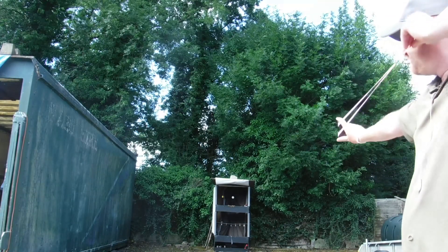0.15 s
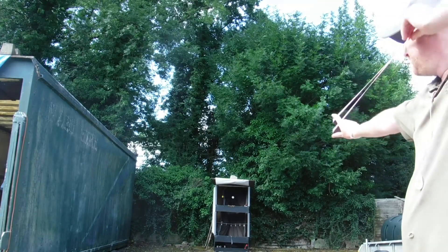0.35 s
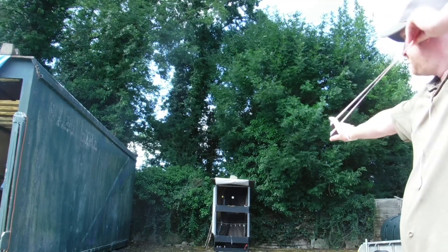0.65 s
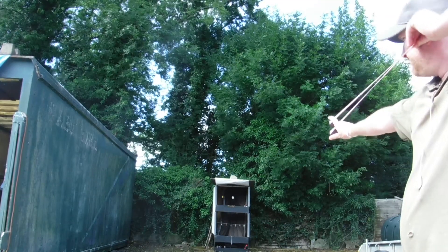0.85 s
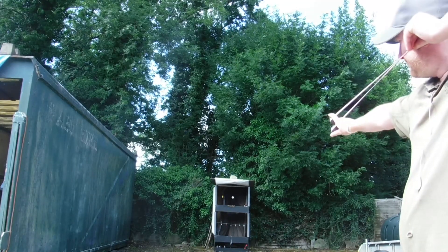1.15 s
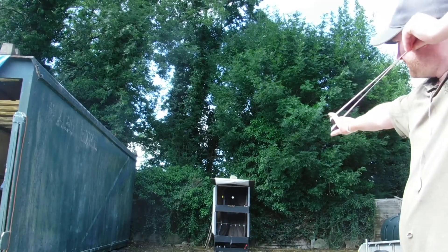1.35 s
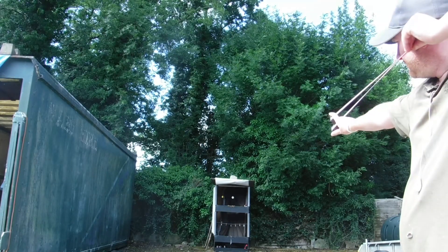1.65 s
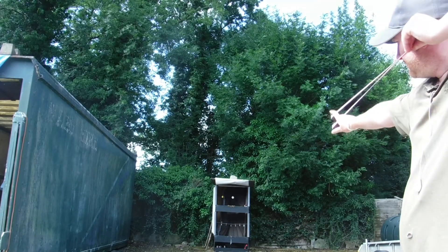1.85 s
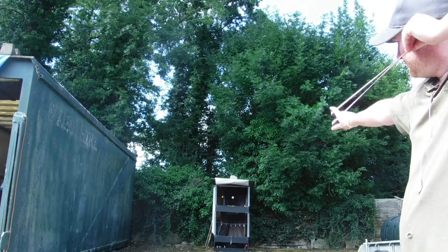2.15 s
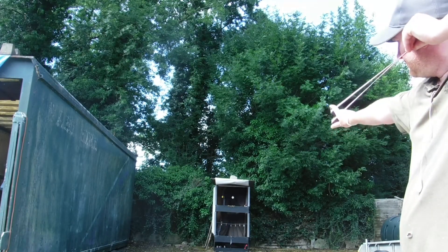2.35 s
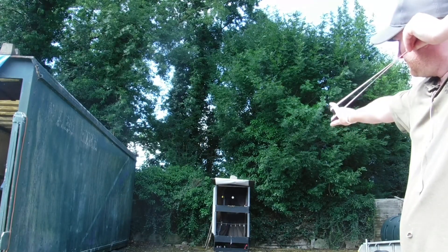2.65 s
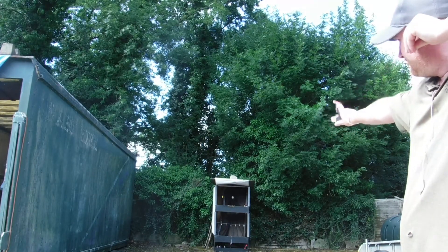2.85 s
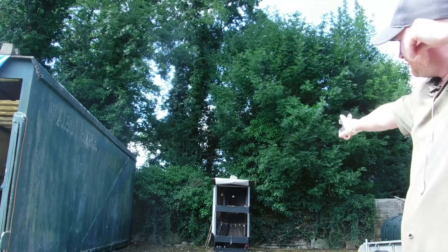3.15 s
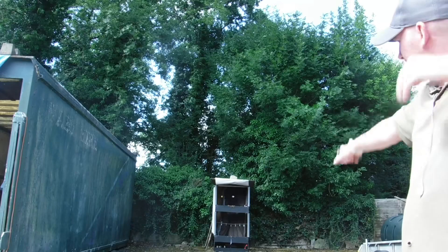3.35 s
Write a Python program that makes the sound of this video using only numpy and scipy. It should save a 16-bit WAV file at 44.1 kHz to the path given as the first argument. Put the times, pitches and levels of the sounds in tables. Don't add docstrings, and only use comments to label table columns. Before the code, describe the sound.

A slingshot snaps sharply, its ball cracks against a catch box, then drops with a softer knock.

```python
import sys
import numpy as np
from scipy import signal
from scipy.fft import rfft, irfft
from scipy.io import wavfile
from scipy.ndimage import uniform_filter1d

SR = 44100
rng = np.random.default_rng(int(sys.argv[2]) if len(sys.argv) > 2 else 0)


def volts(x):
    e = np.asarray(x, float) / 20
    return 10 ** e


def transcribe(signal):
    frames = np.atleast_2d(signal).T
    limited = np.clip(frames, -1, 1)
    pcm = np.round(limited * 32767).astype(np.int16)
    wavfile.write(sys.argv[1], SR, pcm)


N = 154350
HEDGE_GRAIN_DB = 1.2


def band(x, hz, width_hz):
    return signal.lfilter(*signal.iirpeak(min(hz, .45 * SR), max(hz / width_hz, .3), fs=SR), x)


def steep(x, hz, width_hz):
    return band(band(x, hz, width_hz), hz, 2 * width_hz)


def dull(x, hz):
    return signal.lfilter(*signal.butter(2, min(hz, .45 * SR), fs=SR), x)


def unit(x):
    return x / np.sqrt(np.mean(x ** 2))


def peak(x, db):
    return x * volts(db) / np.abs(x).max()


def colour(points, size):
    hz, db = np.array(points, float).T
    f = np.arange(size // 2 + 1) * SR / size + 1
    gain = volts(np.interp(np.log(f), np.log(hz), db))
    return unit(irfft(rfft(rng.standard_normal(size)) * gain, size))


def tint(x, points):
    hz, db = np.array(points, float).T
    f = np.arange(1025) * SR / 2048 + 1
    cepstrum = irfft(np.log(volts(np.interp(np.log(f), np.log(hz), db))))
    folded = np.r_[cepstrum[0], 2 * cepstrum[1:1024], np.zeros(1024)]
    h = irfft(np.exp(rfft(folded)))[:1024]
    return signal.fftconvolve(x, h / np.linalg.norm(h))[:len(x)]


def walk(rate_hz, size=N):
    k = max(int(SR / rate_hz), 1)
    steps = rng.standard_normal(size + 1)[:size // k + 1]
    return unit(uniform_filter1d(np.repeat(steps, k), k)[:size])


def fall(t, t60_s):
    return (t >= 0) * volts(-60 * np.maximum(t, 0) / t60_s)


def swell(rows):
    t = np.arange(N) / SR
    out = np.zeros(N)
    for s, rise, hold, t60_s, db in rows:
        release = fall(np.maximum(t - s - rise - hold, 0), t60_s)
        out += volts(db) * np.clip((t - s) / rise, 0, 1) * release
    return out


def grains(points, envelope, rate_hz, spread_db):
    size = len(envelope)
    level = volts(spread_db * walk(rate_hz, size=size)) * envelope
    return tint(rng.standard_normal(size) * level, points)


def add(out, s, x):
    i = int(round(s * SR))
    out[i:i + len(x)] += x[:N - i]


def add_peak(out, s, x):
    add(out, s - np.abs(x).argmax() / SR, x)


def air():
    # (frequency [Hz], density [dB per Hz])
    hiss_tone = [(18, -39), (30, -12.5), (415, -9.5), (1040, -5.5), (1430, -2.5), (1860, -9), (4910, -7),
                 (8300, -21.5), (16000, -29.5)]
    # (frequency [Hz], width [Hz], level [dB])
    drones = [(1420, 170, -59), (6860, 250, -75), (9490, 450, -74), (11600, 700, -79), (14500, 3000, -74),
              (15350, 500, -81), (4700, 1500, -56)]
    # (frequency [Hz], level [dB])
    whine = [(6844, -72), (6784, -81), (6904, -80), (7420, -85)]
    # (start [s], rise [s], hold [s], fall t60 [s], level [dB])
    gusts = [
        (.6, 0.052, .05, 0.285, -55),
        (.76, 0.032, 0.216, 0.31, -55),
    ]
    # (start [s], rise [s], hold [s], fall t60 [s], level [dB])
    rustles = [
        (.62, 0.0085, 0.076, .1, -67),
        (1.61, 0.012, 0.064, .1, -68),
        (2.66, 0.017, 0.092, .1, -68),
    ]
    rustle_hz, waver_db, gust_db = 11200, 1.2, 4
    t = np.arange(N) / SR
    out = volts(-50.5) * fall(t, 194) * colour(hiss_tone, size=N)
    for hz, width_hz, db in drones:
        waver = walk(4.516) / 2 + walk(24.904)
        out += volts(db + waver_db * waver) * unit(steep(rng.standard_normal(N), hz, width_hz))
    for hz, db in whine:
        out += volts(db) * np.sin(2 * np.pi * hz * t)
    out += swell(gusts) * unit(steep(rng.standard_normal(N), 3230, 1800))
    for k in (.865, 1.055):
        out += swell(rustles) * unit(steep(rng.standard_normal(N), k * rustle_hz, 1300))
    breeze = unit(band(rng.standard_normal(N), 105, 63))
    return out + volts(-69 + gust_db * walk(2.95)) * fall(t, 8.2) * breeze


def sparrow():
    # (start [s], length [s], level [dB], top [Hz], lowest [Hz])
    chirps = [(.002, 0.0366, -46.5, 6150, 4528), (0.197, 0.0362, -42, 6080, 4684),
              (0.339, 0.157, -58.5, 2291, 1903), (0.591, 0.04, -44, 6049, 4805),
              (0.621, 0.0846, -49.5, 4876, 4129), (0.766, 0.042, -42.5, 6084, 4210),
              (0.801, 0.087, -48.5, 4900, 4113), (0.934, 0.0458, -43, 5953, 4605),
              (0.952, 0.0754, -49.5, 4793, 4020), (1.101, 0.0537, -44.5, 6235, 4788),
              (1.382, 0.0424, -46.5, 6130, 4574), (1.662, 0.059, -45, 6200, 4611),
              (1.844, 0.0539, -44, 5990, 4421), (2.027, 0.0558, -44, 6093, 4441),
              (2.237, 0.0476, -44, 6200, 4576), (2.469, 0.048, -45.5, 5800, 4277),
              (2.757, 0.0707, -43, 5960, 4497), (3.247, 0.0336, -45, 6050, 4530),
              (3.456, 0.0304, -44.5, 6057, 4500)]
    warble_hz, warble_jitter, first_dip, direct_gain = 147.45, .35, .8, 0.65
    out = np.zeros(N)
    for s, length_s, db, top_hz, low_hz in chirps:
        u = np.arange(int(length_s * SR)) / (length_s * SR)
        rate_hz = warble_hz * (1 + warble_jitter * walk(120, size=len(u)))
        swing = np.abs(signal.sawtooth(np.pi * np.cumsum(rate_hz) / SR + np.pi))
        depth = first_dip + (1 - first_dip) * np.sqrt(u)
        hz = top_hz + 120 - (240 + top_hz - low_hz) * depth * swing
        fade = np.clip(12 * np.minimum(u, 1 - u), 0, 1)
        add(out, s, volts(db) * np.sin(2 * np.pi * np.cumsum(hz) / SR) * fade)
    trees = rng.standard_normal(SR // 2) * fall(np.arange(SR // 2) / SR, 0.333)
    blurred = signal.fftconvolve(out, trees / np.linalg.norm(trees))[:N]
    return 1.075 * blurred + direct_gain * out


def ticks():
    # (peak [s], level [dB], ring [Hz], width [Hz])
    clicks = [(.6845, -39, 2300, 1100), (1.0387, -25, 3900, 2200), (1.0408, -35, 4300, 1800),
              (1.034, -49, 230, 150), (2.7590, -35, 5000, 900), (2.800, -43, 70, 200),
              (2.822, -32, 250, 300), (2.8225, -22, 800, 500), (2.9690, -33, 260, 200),
              (2.970, -24, 850, 500), (2.992, -48, 220, 250), (3.08, -60, 50, 60), (3.125, -55, 180, 80),
              (3.132, -54, 55, 60), (3.172, -55, 90, 60)]
    out, t = np.zeros(N), np.arange(1500) / SR
    for s, db, hz, width_hz in clicks:
        push = (1 + .3 * rng.standard_normal(1500)) * fall(t, 0.0003)
        add_peak(out, s, peak(steep(push, hz, width_hz), db))
    return out


def bands():
    # (peak [s], level [dB], ring [Hz], push length [s], low slap [dB])
    snaps = [(2.7990, -17.5, 4800, 0.00053, -7.5), (2.8001, 6.5, 4755, 0.000298, -20.5),
             (2.8052, -12, 4700, 0.00063, -7), (2.8064, -16, 5300, 0.00034, -5.5),
             (2.8093, -21, 5000, 0.00048, -6), (2.813, -12, 4500, 0.001, -2.5),
             (2.8144, -1.5, 5050, 0.00094, 1), (2.8161, 0, 5200, 0.000272, -6),
             (2.8175, -13, 6000, 0.0005, 1), (2.8188, -10, 5500, 0.00061, 2.5),
             (2.8197, -6, 4550, 0.00049, 6.5), (2.8212, -10.5, 5060, 0.00055, 7),
             (2.8223, 8, 4683, 0.00056, -2.5), (2.8234, 4, 5620, 0.000431, 0),
             (2.8241, -17.5, 4000, .0005, 0), (2.8266, 3, 4555, 0.000578, -4),
             (2.832, -14, 5350, 0.00024, -3), (2.8325, -22.5, 5140, 0.00071, -4.5),
             (2.8339, -15, 4610, .0004, 3.5), (2.8354, -9, 4760, 0.00037, -3.5),
             (2.8367, -10.5, 4220, 0.0004, 4), (2.8391, -7, 5630, .0007, -12.5),
             (2.8405, -7, 4850, .0004, -10), (2.8428, -10.5, 4760, 0.0005, 2),
             (2.8455, -8.5, 4980, 0.00042, -13), (2.8494, -19.5, 5490, 0.00075, -5),
             (2.8732, -29.5, 5170, .0008, 5), (2.8838, -22.5, 4330, 0.00091, 7),
             (2.8897, -20, 4800, .0008, -6), (2.906, -27.5, 5750, .0008, -10.5)]
    # (start [s], rise [s], hold [s], fall t60 [s], level [dB])
    flutter = [
        (2.797, 0.00303, .001, 0.0116, -25),
        (2.803, 0.0184, 0.0063, 0.0353, -19),
        (2.829, 0.00394, 0.0119, 0.0253, -21),
    ]
    # (frequency [Hz], density [dB per Hz])
    flutter_tone = [(59, -86), (100, -32.5), (910, -18), (1310, -18), (1650, -11), (3320, -7), (5420, -2.5),
                    (9820, -19), (16000, -33.5)]
    # (start [s], rise [s], hold [s], fall t60 [s], level [dB])
    wash = [
        (2.848, 0.0038, 0.0116, 0.137, -35),
        (2.870, 0.0115, 0.0108, 0.51, -34.5),
    ]
    # (frequency [Hz], density [dB per Hz])
    wash_tone = [(100, -48.5), (300, -27.5), (1100, -20.5), (1650, -9.5), (3600, -7.5), (4800, 0.5),
                 (7000, -8.5), (10500, -21.5), (16000, -44)]
    out, t = np.zeros(N), np.arange(600) / SR
    for s, db, hz, push_s, low_db in snaps:
        push = np.clip(np.minimum(t / .0002, 2 - 2 * t / push_s), 0, 1)
        hit = rng.standard_normal(600) * push
        bright = volts(-16 + 1.4 * db) * unit(steep(hit, 14000, 4880))
        ring = unit(unit(steep(hit, hz, 1068)) + bright)
        slap = volts(-11 + low_db) * unit(steep(hit, 1770, 1068))
        wide = volts(-3) * unit(tint(hit, flutter_tone))
        add_peak(out, s, peak(ring + slap + wide, db))
    out += grains(flutter_tone, swell(flutter), rate_hz=980, spread_db=3)
    return out + grains(wash_tone, swell(wash), rate_hz=400, spread_db=HEDGE_GRAIN_DB)


def tail(near_db, far_db, last_s):
    # (frequency [Hz], density [dB per Hz])
    near_tone = [(300, -59.5), (519, -25.5), (1170, -8.5), (1430, -12.5), (4090, 3), (7500, -14.5),
                 (10400, -26), (16000, -50.5)]
    # (frequency [Hz], density [dB per Hz])
    far_tone = [(300, -35.5), (470, -30), (1140, -21.5), (1400, -15.5), (3300, -3.5), (5000, -9),
                (7500, -23.5), (16000, -51.5)]
    t = np.arange(SR) / SR
    near = volts(near_db) * fall(t, .13)
    far = volts(far_db) * fall(t, 1.5) * fall(np.maximum(t - last_s, 0), .8)
    return grains(near_tone, near, 330, HEDGE_GRAIN_DB) + grains(far_tone, far, 221, HEDGE_GRAIN_DB)


def ball(s, db, ring, tone, order):
    # (delay [s], after strike [dB], after drop [dB])
    echoes = [(.0030, 0, -1), (.0044, 0, -7), (.0062, -4, -13), (.0073, -14, -5), (.0090, -11, -10),
              (.0113, -21, -15), (.0139, -20, -19), (.0162, -12, -13), (.0186, -22, -9), (.0215, -22, -18),
              (.0287, -15, -25), (.0309, -26, -14), (.0350, -18, -15), (.0482, -19, -27), (.0520, -27, -24),
              (.0750, -29, -30), (.1010, -16, -25), (.1056, -21, -27)]
    # (near [dB], far [dB], last far echo [s])
    scatter = [
        (-19.5, -30.5, .21),
        (-20, -37, .3),
    ]
    crack_db, ring_widen, echo_scatter_db, box_low_hz, rattle_t60_s = -4, 1.7, 3, 1300, .003
    top_hz, dull_s = 16560, 0.0203
    box_cut = signal.butter(3, box_low_hz, "high", fs=SR, output="sos")
    out, t = np.zeros(N), np.arange(2400) / SR
    for late_s, echo_db in [(0.000054, 0)] + [(row[0], row[order]) for row in echoes]:
        chance = rng.standard_normal(2400)
        modes = np.zeros(2400)
        for k, (hz, width_hz, mode_db) in enumerate(ring):
            level = (-1) ** k * volts(mode_db + echo_scatter_db * chance[-1 - k])
            modes += level * np.sin(2 * np.pi * hz * t) * np.exp(-np.pi * ring_widen * width_hz * t)
        modes = signal.sosfilt(box_cut, modes)
        crack = tint(chance * fall(t, rattle_t60_s), tone)
        blow = dull(unit(modes) + volts(crack_db) * unit(crack), top_hz / (1 + late_s / dull_s))
        add(out, s + late_s, peak(blow, db + echo_db))
    add(out, s + 0.0058, tail(*scatter[order - 1]))
    return out


def strike():
    # (frequency [Hz], width [Hz], level [dB])
    ring = [(1515, 97.5, -17.5), (1609, 119, -16), (1988, 163, -12), (2330, 138, -8.5), (2947, 230, -3),
            (3173, 160, -5.5), (3692, 224, -1), (4404, 173, -3.5), (4767, 167, -4), (5405, 260, -15),
            (5760, 300, -13.5), (6808, 340, -15), (7370, 250, -19.5)]
    # (frequency [Hz], density [dB per Hz])
    tone = [(100, -39.5), (550, -26), (1000, -13.5), (3700, -0.5), (5000, -4), (8900, -23), (11500, -13.5),
            (16000, -19.5)]
    return ball(2.9656, 5, ring, tone, order=1)


def drop():
    # (frequency [Hz], width [Hz], level [dB])
    ring = [(481, 33.7, -21.5), (866, 38, -20), (1291, 30, -17), (2294, 192, -6.5), (2527, 77, -1.5),
            (3055, 169, 0.5), (3326, 101, -3), (3480, 191, -2), (3999, 132, -6), (4510, 185, -14.5),
            (5100, 305, -7), (6200, 360, -28.5)]
    # (frequency [Hz], density [dB per Hz])
    tone = [(100, -39.5), (424, -25), (1080, -10), (1800, -5), (2860, -10.5), (4500, 5.5), (6420, -9),
            (9000, -42), (16000, -75)]
    top_hz = 7200
    return dull(dull(ball(3.2876, -1, ring, tone, order=2), top_hz), top_hz)


def scene():
    quiet_cut = signal.ellip(12, .2, 60, 15730, fs=SR, output="sos")
    out = signal.sosfilt(quiet_cut, air() + sparrow())
    out += ticks() + bands()
    add(out, 2.822, tail(near_db=-49, far_db=-42.5, last_s=0.47))
    out += strike() + drop()
    return out[None]


def roll_off(x):
    return signal.sosfilt(signal.butter(12, 16630, fs=SR, output="sos"), x)


def record(dry):
    bass_cut_hz, top_hz = 800, 16300
    clipped_off = np.clip(dry, -1, 1) - dry
    clipping = signal.lfilter(*signal.butter(1, bass_cut_hz, "high", fs=SR), clipped_off)
    cut = signal.sosfilt(signal.ellip(6, .2, 50, top_hz, fs=SR, output="sos"), dry + clipping)
    return roll_off(np.clip(cut, -1, 1))


dry = scene()
out = record(dry)
transcribe(out)
```